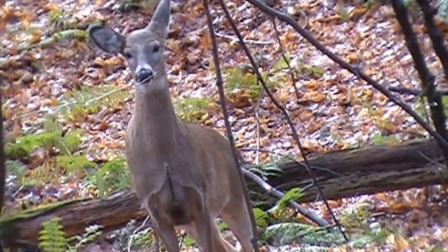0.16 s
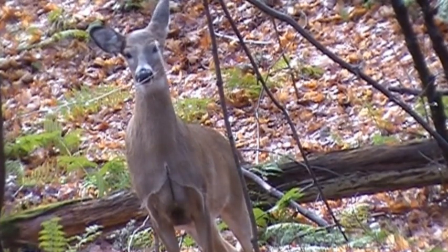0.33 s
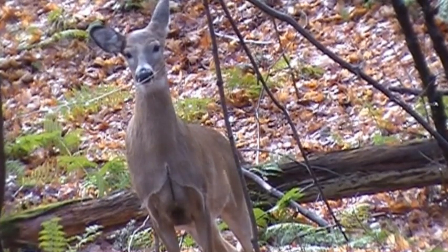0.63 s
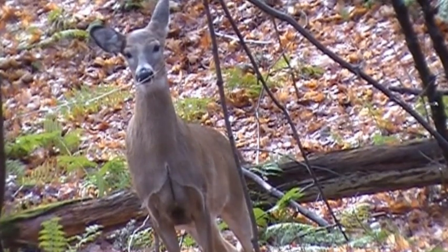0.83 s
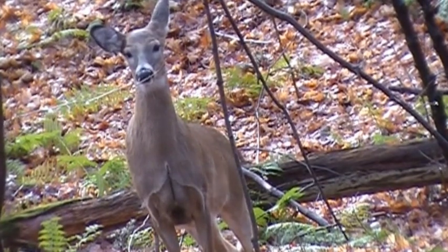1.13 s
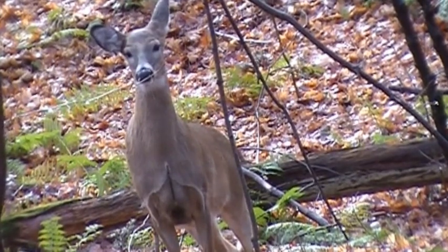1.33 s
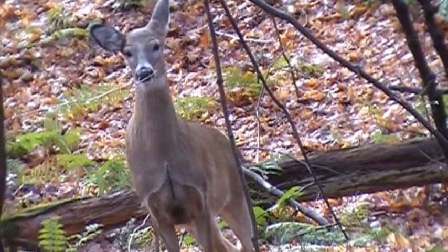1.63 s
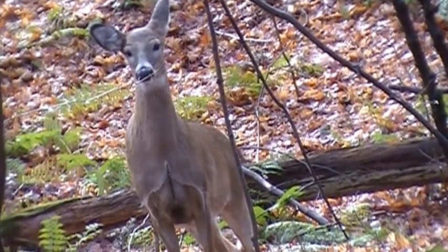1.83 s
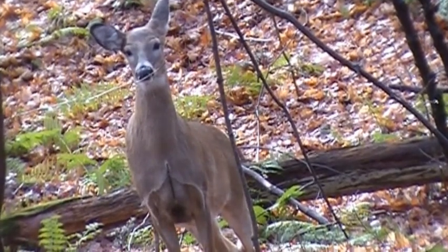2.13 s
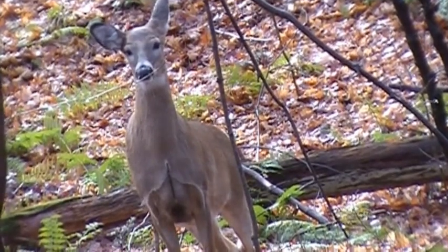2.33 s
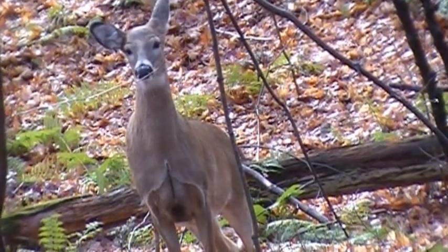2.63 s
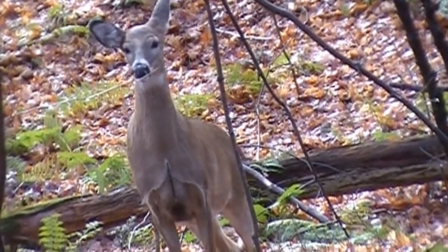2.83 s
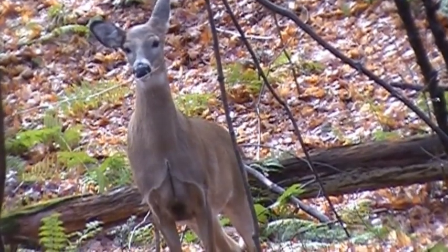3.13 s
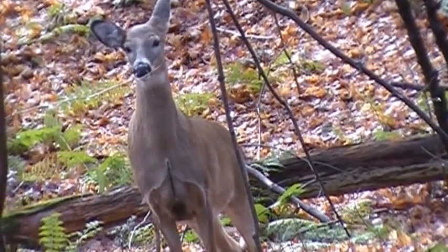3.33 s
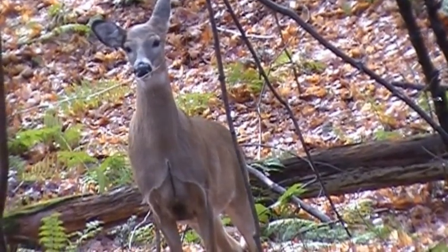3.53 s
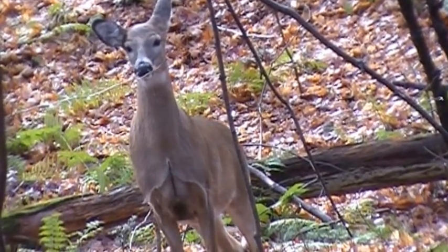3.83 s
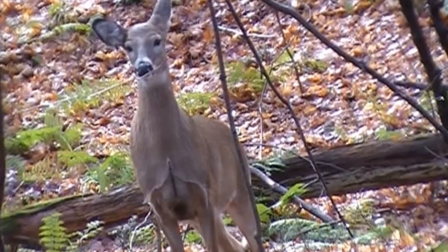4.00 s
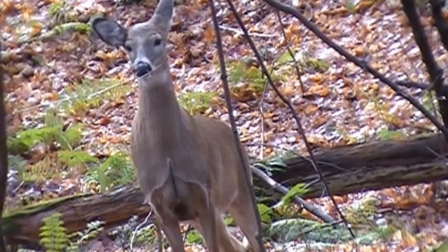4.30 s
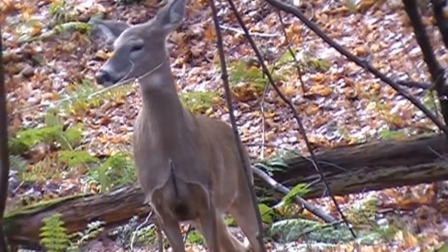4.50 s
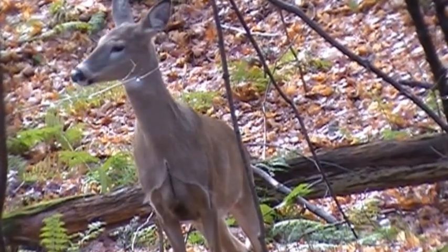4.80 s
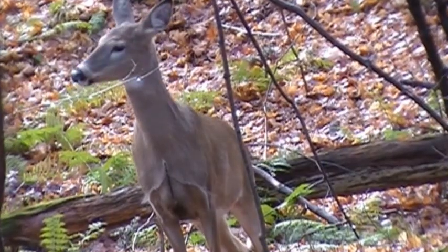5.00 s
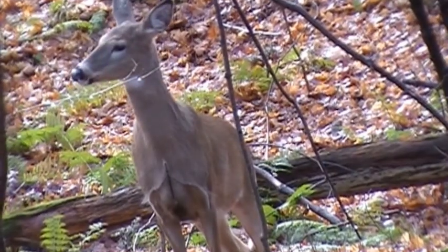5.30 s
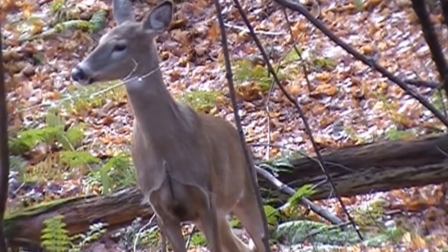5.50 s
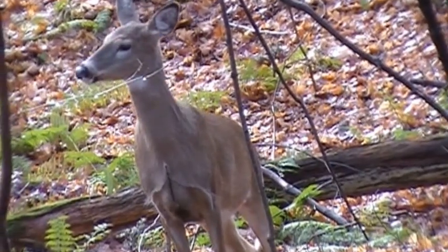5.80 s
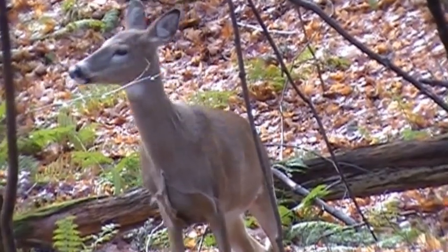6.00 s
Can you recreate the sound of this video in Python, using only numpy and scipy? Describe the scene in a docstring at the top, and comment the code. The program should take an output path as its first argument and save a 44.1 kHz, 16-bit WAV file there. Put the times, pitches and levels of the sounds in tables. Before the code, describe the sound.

A quiet wood in light rain, lasting about six seconds. From the start, many fine drops patter on dry fallen leaves, with bright ticks and small hollow taps close by; near drops are thickest from 0.4 to 1 second. The patter then thins steadily, leaving isolated ticks, including a pair just after 4 seconds and a crisp one near the end. Small birds give a few faint chirps at the very start over blurred flock chatter, which dips around 1 second. From 1.5 to 2.3 seconds quick sliding chirps return, mostly falling, with a few rising. Brighter clusters come at 3 to 3.3, 3.5 and 3.75 seconds, a rising note near 4.5, and a tight flurry around 4.85. Softer paired chirps continue to the end. Trunks scatter short echoes. Beneath lies a soft, slightly easing wash of distant rain and air, in close, narrow stereo.

```python
"""Light rain on dry fallen leaves in a wood: each drop is a noise burst with a bright tick and a hollow tap.
Single near drops stand out over a thinning patter of small ones.
A flock of small birds chatters in quick sliding near-sine chirps, scattered into echoes by the trunks.
Under it lies the soft wash of distant rain and air: noise with drifting patches. Heard at two close ports."""
import sys
import numpy as np
from scipy import signal
from scipy.fft import rfft, irfft
from scipy.io import wavfile
from scipy.ndimage import uniform_filter1d

SR = 44100
rng = np.random.default_rng(int(sys.argv[2]) if len(sys.argv) > 2 else 0)


def to_wav(s):
    """Save 16-bit WAV."""
    ch = np.atleast_2d(s).T  # columns
    pcm = np.round(np.clip(ch, -1, 1) * 32767)  # PCM
    wavfile.write(sys.argv[1], SR, pcm.astype(np.int16))


N = 271215
TIME_S = np.arange(N) / SR
SIDES = np.array([[.5], [-.5]])  # left, right share of a port difference


def gain_of(db):
    """Decibels to an amplitude factor."""
    return 10 ** (np.asarray(db) / 20)


def evened(x):
    """Scales to rms 1."""
    return x / np.sqrt(np.mean(x ** 2) + 1e-20)


def read(points, hz):
    """Interpolates a spectrum table on a log-frequency axis."""
    f, value = np.transpose(points)
    return np.interp(np.log(hz + 1), np.log(f + 1), value)


def add(mix, start_s, sound):
    """Mixes a two-channel sound in at a time."""
    part = mix[:, round(start_s * SR):][:, :sound.shape[1]]
    part += sound[:, :part.shape[1]]


LAG_S_PER_DB = 2.2e-5  # the ports sit a finger apart


def ports(sound, pan_db):
    """A source off to one side is louder and a little earlier at the nearer port; positive pans left."""
    hz = np.fft.rfftfreq(len(sound), 1 / SR)
    lead_s = SIDES * pan_db * LAG_S_PER_DB
    shift = gain_of(SIDES * pan_db) * np.exp(2j * np.pi * hz * lead_s)
    return irfft(rfft(sound) * shift, len(sound))


def wood(dry_sound, t60_s, wet_db, build_s=.012, count=3):
    """Trunks and ground scatter sound into echoes that build up, then die; the pattern keeps fading to another."""
    t = np.arange(SR // 2) / SR
    envelope = gain_of(-60 * t / t60_s) * (1 - np.exp(-(t / build_s) ** 2))
    out = dry_sound
    for k in range(count):
        sparse = rng.choice([-1., 1.], (3, len(t))) * (rng.random((3, len(t))) < .04)
        shared, left, right = sparse
        taps = (shared + 0.083 * np.array([left, right])) * envelope
        taps = taps / np.linalg.norm(taps[0])
        turn = np.sqrt(2 / count) * np.cos(np.pi * (3 * TIME_S + k / count))  # fades between patterns
        out = out + gain_of(wet_db) * signal.fftconvolve(dry_sound * turn, taps, axes=1)[:, :N]
    return out


SETTLE_S = .002  # silence before each splash
# Leaf tick colour: f/Hz, relative level/dB
LEAF_COLOUR = [(150, -60), (600, -2), (1500, -43), (3000, 0), (6000, -1), (8000, -2.5), (11000, -14.5),
               (15000, -36)]


def tick(noise, tick_db, tap_db, ring_hz, splash_s=.0014, tap_s=.0022, ring_db=4.5, width_hz=900, tap_hz=1700):
    """A drop splashes for a few milliseconds; the leaf rings high and its hollow taps low."""
    size = len(noise)
    t, f = np.arange(size) / SR - SETTLE_S, np.fft.rfftfreq(size, 1 / SR)
    decay = np.exp(-t / np.array([[splash_s], [tap_s]]))
    spray = .1 * np.exp(-t / .007)
    burst = noise * (decay + spray) * (t > 0)
    ring = ring_db * np.exp(-((f - ring_hz) / width_hz) ** 2)
    crisp_filter = gain_of(read(LEAF_COLOUR, f) + ring)
    hollow_filter = np.exp(-(np.log(f / tap_hz + 1e-9) / 0.65) ** 2)
    crisp, hollow = irfft(rfft(burst) * np.array([crisp_filter, hollow_filter]), size)
    return gain_of(tick_db) * crisp / abs(crisp).max() + gain_of(tap_db) * hollow / abs(hollow).max()


# Near drops: t/s, relative tick level/dB, relative hollow tap level/dB, ring f/Hz
NEAR_DROPS = [(0.0715, -44, -45.5, 6790), (0.1073, -38, -43, 6570), (0.1296, -44, -43, 5920),
              (0.2209, -47, -55, 7800), (0.237, -42, -56, 5700), (0.299, -44, -56, 6230),
              (0.324, -44, -45, 6200), (0.335, -39, -50, 5690), (0.378, -46, -47, 5630),
              (0.412, -35, -48, 5760), (0.417, -38, -51, 6130), (0.4354, -40, -39, 5830),
              (0.4441, -40, -38.5, 5920), (0.4517, -34.5, -39, 6270), (0.4582, -42, -47, 5660),
              (0.4688, -31, -53, 5770), (0.5202, -45, -58, 6700), (0.5264, -46, -62, 5650),
              (0.569, -31.5, -40.5, 6400), (0.611, -46, -58, 5780), (0.641, -47, -45, 6230),
              (0.6608, -35.5, -47, 6720), (0.6796, -44, -45, 6330), (0.7123, -39, -43, 6170),
              (0.7259, -35, -51, 5900), (0.7516, -30.5, -48, 5800), (0.7714, -35.5, -52, 5720),
              (0.797, -39, -46, 6260), (0.8119, -45, -41.5, 5630), (0.826, -38, -46, 6150),
              (0.8524, -31, -52, 6710), (0.8857, -40, -46, 5810), (0.9716, -39.5, -50, 6780),
              (0.9981, -39, -46, 5600), (1.0326, -40, -50, 8600), (1.049, -40, -52, 6520),
              (1.1438, -41, -49, 5870), (1.207, -43, -48, 5630), (1.2597, -42, -49, 5600),
              (1.3616, -41, -46.5, 5630), (1.4466, -39, -54, 5940), (1.5638, -44, -44, 6980),
              (1.708, -40, -51, 6420), (1.7614, -40, -55, 5600), (1.7817, -45, -40.5, 5650),
              (1.8153, -42, -53, 6620), (1.8632, -45, -53, 5610), (1.8925, -37, -45, 6220),
              (1.921, -40, -47, 5950), (1.985, -47, -58, 6350), (2.14, -38, -49.5, 5600),
              (2.1544, -49, -46.5, 5700), (2.2039, -46, -50, 5600), (2.259, -44, -53, 6000),
              (2.391, -41, -55, 7400), (2.5012, -44, -58, 6540), (2.5504, -38.5, -61, 7500),
              (2.7302, -41, -46, 5670), (2.7658, -38, -52, 6820), (2.779, -45, -48, 5660),
              (2.8632, -38.5, -57, 5620), (2.9552, -38, -50, 5720), (3.0053, -46, -49.5, 6270),
              (3.053, -51, -56, 5600), (3.1803, -51, -44.5, 6030), (3.2894, -41, -51, 5800),
              (3.7394, -46, -54, 5790), (3.8846, -43, -52, 6230), (4.0285, -34, -42.5, 5920),
              (4.054, -36.5, -49, 5840), (4.1475, -40, -47, 5800), (4.2572, -46, -52, 6130),
              (4.3966, -50, -50, 5890), (4.7471, -44, -54, 5670), (5.1173, -44, -52, 6300),
              (5.225, -45, -48, 5800), (5.4196, -48, -57, 5850), (5.44, -48, -54, 6220),
              (5.4857, -39, -53, 6660), (5.5434, -55, -46, 5800), (5.7528, -48, -48, 5630),
              (5.888, -47, -57, 5770), (5.9708, -35, -60, 6340)]


def near_drops(tick_gain_db=2.9, tap_gain_db=5.8):
    """Single drops land close by, a little left or right, each over its own hollow."""
    out = np.zeros((2, N))
    draws = rng.standard_normal((len(NEAR_DROPS), 1026))
    for (start_s, tick_db, tap_db, ring_hz), row in zip(NEAR_DROPS, draws):
        pan_db, tap_hz = 0.5 * row[0], 1700 * np.exp(0.16 * row[1])
        sound = tick(row[2:], tick_db + tick_gain_db, tap_db + tap_gain_db, ring_hz, ring_db=7, tap_hz=tap_hz)
        add(out, start_s - SETTLE_S, ports(sound, pan_db))
    return out


PATTER_DB, EASING_DB_PER_S = -52.4, 3


def easing():
    """Level of the small drops falls steadily in dB as the shower eases."""
    return gain_of(PATTER_DB - EASING_DB_PER_S * TIME_S)


def patter(drops_per_s=1100, spread_db=6.5, clump=.45, leaves=36):
    """Many small drops, each on one of many leaves all around; a few are large."""
    shaken = evened(uniform_filter1d(rng.standard_normal(N), size=3000))  # twigs shed their drops in clumps
    falls = rng.random(N) < drops_per_s / SR * np.exp(clump * shaken)
    size = gain_of(spread_db * np.minimum(rng.exponential(1, N), 3)) * falls
    leaf, out = rng.integers(0, leaves, N), np.zeros((2, N))
    for k, (tap, ring, pan) in enumerate(rng.random((leaves, 3))):
        sound = tick(rng.standard_normal(1024), 0, -14 + 14 * tap, 4000 + 4500 * ring)
        hits = (size * (leaf == k))[None]
        out += signal.oaconvolve(hits, ports(sound, 2.5 * (pan - .5)), axes=1)[:, :N]
    return easing() * evened(out)


FLICK_S, FLICK_HZ = .008, 2500  # length and rise of the flick into a joined chirp


def chirp(length_s, start_hz, end_hz, joined, bend_s=.04, flutter_db=4):
    """A near-sine slide that fades out past its end; if joined, it starts with a quick flick up."""
    t = np.arange(-FLICK_S, 1.1 * length_s, 1 / SR)
    bend = np.expm1(-np.maximum(t, 0) / bend_s) / np.expm1(-length_s / bend_s)
    hz = start_hz + (end_hz - start_hz) * bend
    hz = hz - joined * FLICK_HZ * (np.minimum(t, 0) / -FLICK_S) ** 1.6
    hz = uniform_filter1d(hz, size=120, mode="nearest")  # rounds the top of the slide
    knots_s = [-FLICK_S, -.75 * FLICK_S, 0, .4 * length_s, .85 * length_s, 1.1 * length_s]
    shape = np.interp(t, knots_s, [0, 1. * joined, .4 + .55 * joined, 1, .6, 0]) * (joined or t > 0)
    beats, phases = rng.random((2, 3, 1))
    # close echoes beat on the slide
    flutter = np.sin(2 * np.pi * ((70 + 260 * beats) * t + phases)).sum(0) / np.sqrt(3)
    # the voice carries best mid-range and thins out at the top
    throat_db = -3 * ((hz - 4500) / 1000) ** 2 - np.maximum(hz - 4900, 0) / 80
    level = shape * gain_of(throat_db + flutter_db * (flutter - .5))
    return level * np.sin(2 * np.pi * np.cumsum(hz) / SR)


# Falling chirps: t/s, length/s, start f/Hz, relative level/dB
FALLING_CHIRPS = [(0.004, 0.013, 4750, -45.5), (0.034, 0.012, 4440, -47), (0.052, .014, 4900, -47),
                  (0.088, .01, 4500, -47), (0.104, 0.02, 5060, -44), (1.518, .012, 5000, -50),
                  (1.539, 0.021, 5620, -42.5), (1.573, 0.016, 3800, -45), (1.592, 0.0083, 4900, -45),
                  (1.621, .009, 4600, -48), (1.629, .008, 5200, -44), (1.743, .025, 5300, -49),
                  (1.779, 0.037, 5590, -42.5), (1.813, .01, 4900, -43), (1.848, 0.011, 4600, -47),
                  (1.866, .0185, 5300, -42), (1.883, .008, 5050, -44), (1.921, .008, 5000, -43),
                  (1.927, .014, 5300, -46), (1.972, .021, 4700, -47), (1.999, .022, 4850, -45),
                  (2.043, .006, 5000, -44), (2.087, .012, 5000, -47), (2.185, 0.01, 5000, -42),
                  (2.202, 0.0089, 5600, -42.5), (2.221, 0.02, 5300, -41.5), (2.277, .012, 4800, -47),
                  (2.293, 0.0087, 5290, -45.5), (2.463, 0.009, 4700, -47), (2.486, .02, 4700, -44),
                  (2.728, 0.021, 5390, -46.5), (2.977, 0.012, 4800, -42.5), (2.997, .016, 5000, -40),
                  (3.031, .011, 4600, -44), (3.048, .01, 5700, -39), (3.056, 0.024, 4700, -39),
                  (3.061, .021, 5000, -43), (3.086, 0.01, 3900, -47), (3.193, 0.016, 4950, -45),
                  (3.218, .022, 4700, -41), (3.247, .012, 4950, -43), (3.282, 0.015, 5300, -47),
                  (3.302, 0.025, 5420, -41), (3.328, .016, 4700, -44.5), (3.49, 0.0066, 4750, -39),
                  (3.511, 0.021, 4970, -42), (3.59, .012, 4400, -50), (3.677, .008, 4400, -55),
                  (3.701, 0.02, 4810, -49.5), (3.748, 0.011, 4800, -44), (3.769, 0.017, 5020, -40),
                  (3.888, .008, 4200, -53), (3.904, 0.02, 5200, -47), (4.238, 0.014, 4700, -51),
                  (4.264, 0.028, 4700, -49), (4.314, 0.0098, 4400, -45), (4.333, .03, 5400, -46),
                  (4.51, .031, 4800, -45), (4.626, .009, 4500, -51), (4.647, .028, 5450, -45),
                  (4.743, 0.024, 4650, -44.5), (4.828, 0.009, 4700, -44), (4.84, .008, 4600, -44),
                  (4.847, .0095, 5600, -41), (4.856, .02, 4400, -41.5), (4.862, .03, 5200, -40),
                  (5.094, .012, 4400, -45), (5.113, .034, 5350, -43), (5.239, .012, 4800, -49),
                  (5.26, 0.031, 4900, -46), (5.357, .011, 4600, -52), (5.378, .022, 5050, -51),
                  (5.46, 0.011, 4700, -46), (5.478, 0.022, 5000, -45), (5.597, .009, 4700, -54),
                  (5.611, 0.017, 4850, -50), (5.633, 0.029, 5080, -47), (5.634, .022, 4170, -51),
                  (5.764, .01, 4300, -50), (5.781, 0.032, 4910, -49.5), (5.843, 0.012, 4600, -49),
                  (5.861, 0.03, 4970, -49.5), (5.908, .012, 4900, -51), (5.927, 0.025, 5090, -48),
                  (5.996, .017, 4600, -49), (6.011, .008, 4200, -50), (6.027, .026, 4850, -50),
                  (6.065, 0.012, 4600, -48), (6.086, 0.032, 4900, -47), (6.126, .022, 4900, -50),
                  (6.137, 0.013, 5280, -46)]
# Rising chirps: t/s, length/s, start f/Hz, relative level/dB
RISING_CHIRPS = [(1.603, .009, 4600, -46), (1.835, .01, 3800, -48), (2.032, 0.018, 4050, -53),
                 (2.156, 0.029, 3500, -44), (2.189, 0.018, 3400, -44), (3.045, 0.011, 3800, -44),
                 (3.07, 0.01, 4300, -41), (4.481, 0.025, 3270, -41), (4.714, 0.024, 3400, -45.5),
                 (5.966, 0.017, 3400, -49)]
# How broken up the near chirps arrive through the leaves: t/s, flutter scale/dB
LEAF_FLUTTER = [(0, 8), (3.2, 6), (4, 3.5)]
JOIN_S = .02  # longest pause a flick bridges
REST_HZ, SAG_S = 2270, 0.026  # resting pitch and time constant that set where a fall ends
LEAD_S, LEAD_SAG_S = .0195, .011  # a fall this short that leads into another plunges faster
RISE_HZ_PER_S = 42000


def near_birds():
    """Chirps that stand out; a fall right after another is joined to it unless it is itself a short lead-in."""
    out = np.zeros((2, N + SR))
    start_s, length_s, start_hz, level_db = np.transpose(FALLING_CHIRPS)
    pause_s = start_s[1:] - (start_s + length_s)[:-1]
    joined = np.r_[False, (0 < pause_s) & (pause_s < JOIN_S)]
    leads = np.roll(joined, -1) & (length_s < LEAD_S)
    joined = joined & ~leads
    sag_s = np.where(leads, LEAD_SAG_S, SAG_S)
    end_hz = REST_HZ + (start_hz - REST_HZ) * np.exp(-length_s / sag_s)
    for s, db, *slide in zip(start_s, level_db, length_s, start_hz, end_hz, joined):
        fall = chirp(*slide, flutter_db=np.interp(s, *np.transpose(LEAF_FLUTTER)))
        add(out, s, gain_of(db) * fall * np.ones((2, 1)))
    for s, length, low_hz, db in RISING_CHIRPS:
        flutter_db = np.interp(s, *np.transpose(LEAF_FLUTTER))
        rise = chirp(length, low_hz, low_hz + RISE_HZ_PER_S * length, False, 1, flutter_db)
        add(out, s, gain_of(db) * rise * np.ones((2, 1)))
    return out[:, round(FLICK_S * SR):][:, :N]  # slides, not flicks, start at t


# Far flock chatter: t/s, level/dB
FLOCK_LEVEL = [(0, -48), (.15, -54), (.3, -62), (.45, -49.5), (.56, -55), (.66, -59), (.77, -50.5),
               (.9, -60), (1.05, -72), (1.45, -63), (1.6, -56), (1.7, -59), (1.88, -52), (2.1, -53),
               (2.3, -54), (2.4, -63), (2.92, -72), (3.06, -59), (3.2, -59), (4, -58), (4.28, -67),
               (4.5, -58), (4.95, -59), (5.2, -61.5), (5.5, -59), (5.75, -63.5), (6.15, -61)]


def far_flock(birds=30, chirps_per_s=170):
    """Overlapping quick chirps of many birds further off, blurred by the wood."""
    size = gain_of(2.6 * rng.exponential(1, N)) * (rng.random(N) < chirps_per_s / SR)
    bird, out = rng.integers(0, birds, N), np.zeros(N)
    for k, (length, top, low, join) in enumerate(rng.random((birds, 4))):
        sound = chirp(.008 + .016 * length, 4600 + 1100 * top, 3000 + 1000 * low, join > .4)
        out += signal.oaconvolve(size * (bird == k), sound)[:N]
    out = wood(out * np.ones((2, 1)), t60_s=.4, wet_db=0)
    return gain_of(np.interp(TIME_S, *np.transpose(FLOCK_LEVEL))) * evened(out)


# Wash spectrum: f/Hz, relative level per Hz/dB
WASH_COLOUR = [(15, -58), (25, -12), (64, -28.5), (128, -5), (427, 1.5), (856, -0.5), (2560, -7.5),
               (4150, -6), (4620, -4.5), (7090, -16.5), (11200, -28.5), (13100, -31), (15000, -51)]
# Left-right likeness of the wash: f/Hz, correlation/1
WASH_LIKENESS = [(60, .1), (150, 1), (300, 0.67), (900, 0.6), (2000, 0.4), (3500, 0.84), (6000, 0.96),
                 (9000, 0.16), (15000, 0.19)]
WASH_DB = -52.5


def wash():
    """Far rain and air: random short-time spectra with faint drifting patches."""
    frames, hz = N // 256 + 5, np.fft.rfftfreq(1024, 1 / SR)
    a, b, c, d, patches = rng.standard_normal((frames, 513, 5)).T
    patches = uniform_filter1d(uniform_filter1d(patches, size=12, axis=0), size=14, axis=1)
    patches_db = 0.56 * evened(patches)
    same = np.clip(read(WASH_LIKENESS, hz), -1, 1)[:, None]
    left = a + 1j * b
    right = same * left + np.sqrt(1 - same ** 2) * (c + 1j * d)
    spectra = np.array([left, right]) * gain_of(read(WASH_COLOUR, hz)[:, None] + patches_db)
    noise = signal.istft(spectra, nperseg=1024, noverlap=768)[1][:, :N]
    fade = evened(easing()) ** 0.084  # the far rain eases slightly with the patter
    return gain_of(WASH_DB) * fade * evened(noise)


def scene():
    """Rain, birds and wash together."""
    rain = wood(near_drops() + patter(), t60_s=0.13, wet_db=-7.0, build_s=0.0022)
    birds = gain_of(0.5) * wood(near_birds(), t60_s=0.3, wet_db=-5.5)
    return rain + birds + far_flock() + wash()


# Port level difference, left minus right: f/Hz, level/dB
PORT_BALANCE = [(100, 1.5), (500, .5), (2000, 0.4), (4500, -0.5), (6300, -4), (8300, 2.5), (11000, -0.5)]
# Port phase difference, left leading: f/Hz, phase/rad
PORT_LEAD = [(40, 3), (130, 0.39), (300, -0.08), (3000, 0.04), (5200, -0.47), (7000, 1.17), (8300, 1.32),
             (9200, 0.79), (12000, 1)]
EDGE_HZ = 15300


def record(dry):
    """The two ports differ in level and phase near their resonance; then a low-pass limits the band."""
    hz = np.fft.rfftfreq(N, 1 / SR)
    level = gain_of(SIDES * read(PORT_BALANCE, hz))
    turn = np.exp(1j * SIDES * read(PORT_LEAD, hz))
    heard = irfft(rfft(dry) * level * turn, N)
    low_pass = signal.firwin(511, EDGE_HZ, window=("kaiser", 9), fs=SR)
    return signal.oaconvolve(heard, low_pass[None], "same")


dry = scene()
out = record(dry)
to_wav(out)
```